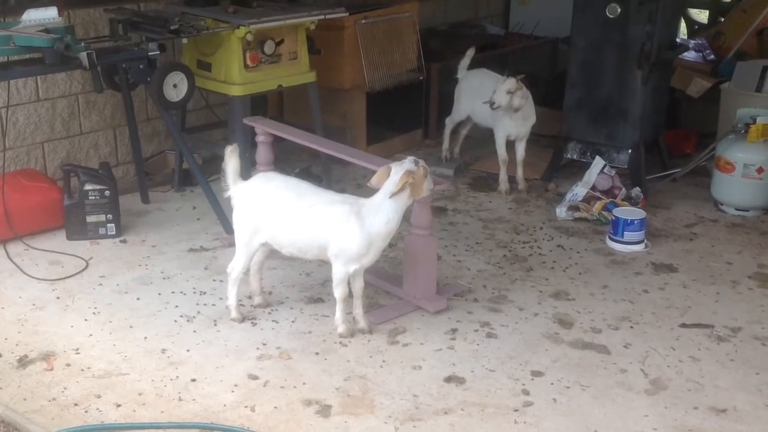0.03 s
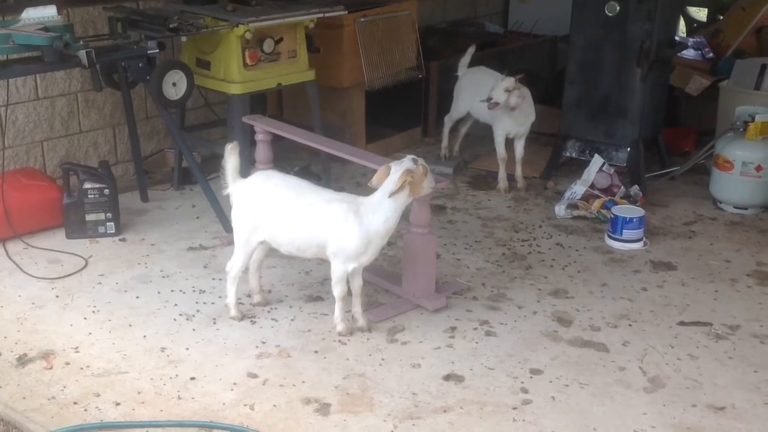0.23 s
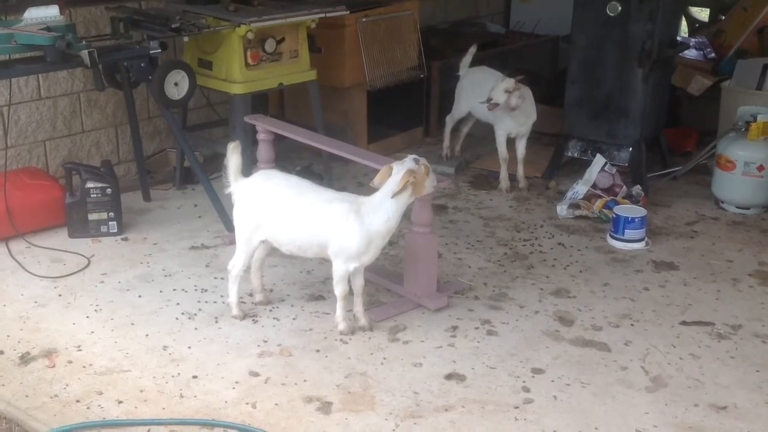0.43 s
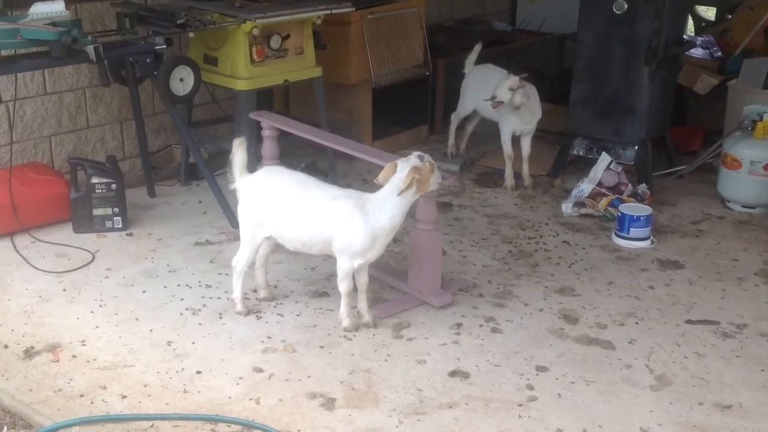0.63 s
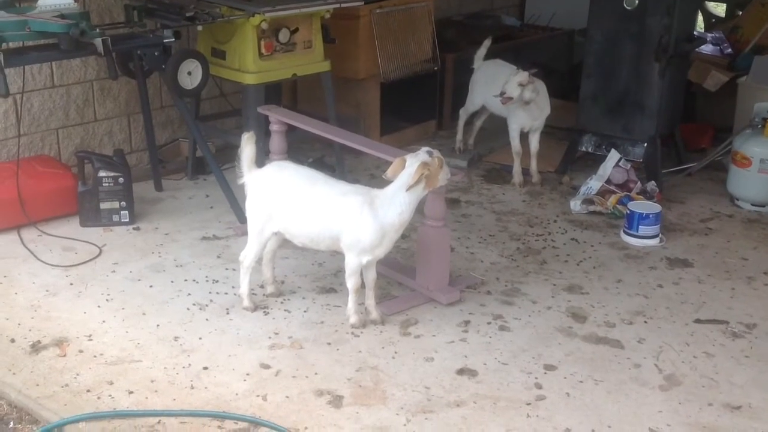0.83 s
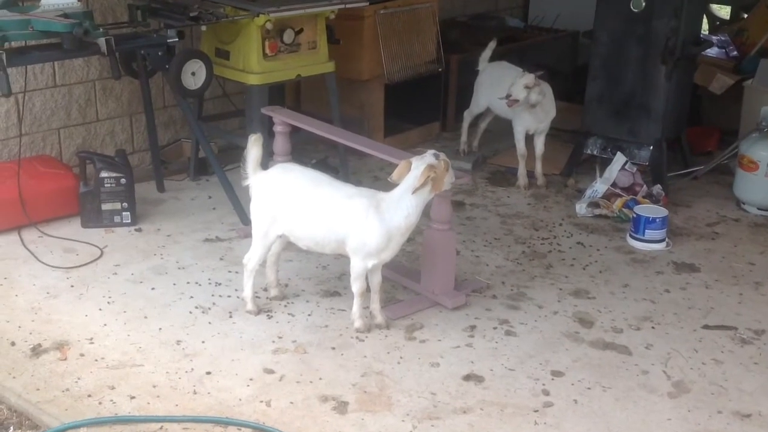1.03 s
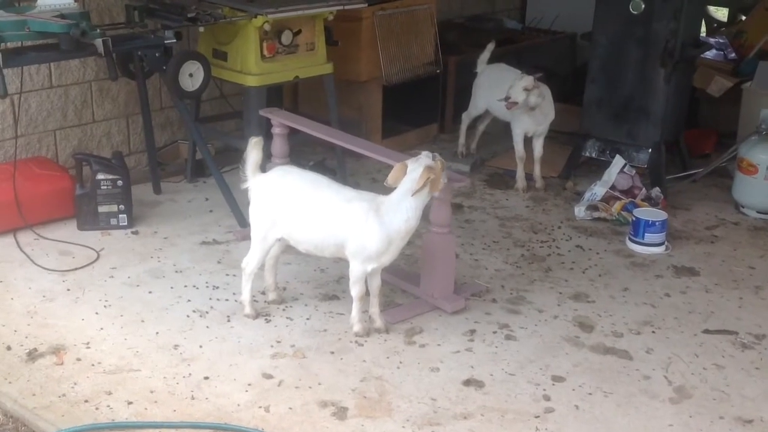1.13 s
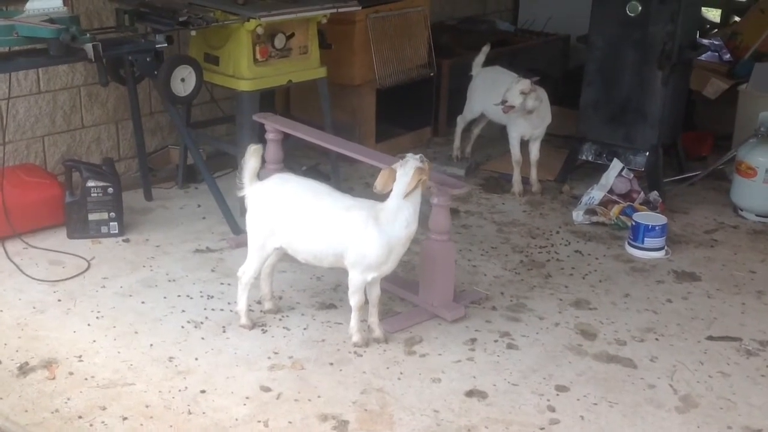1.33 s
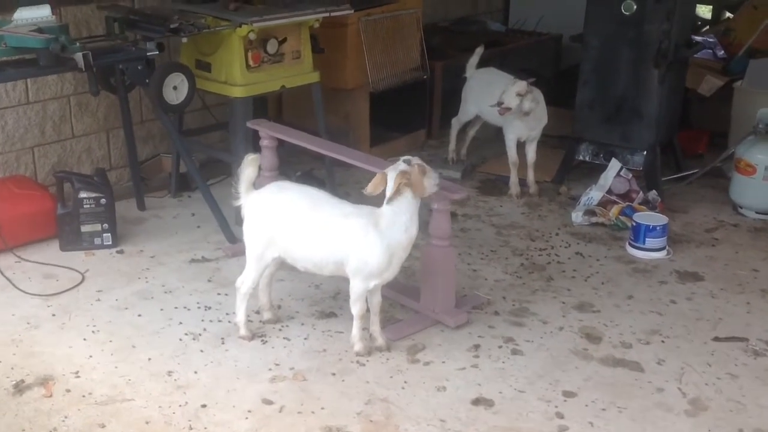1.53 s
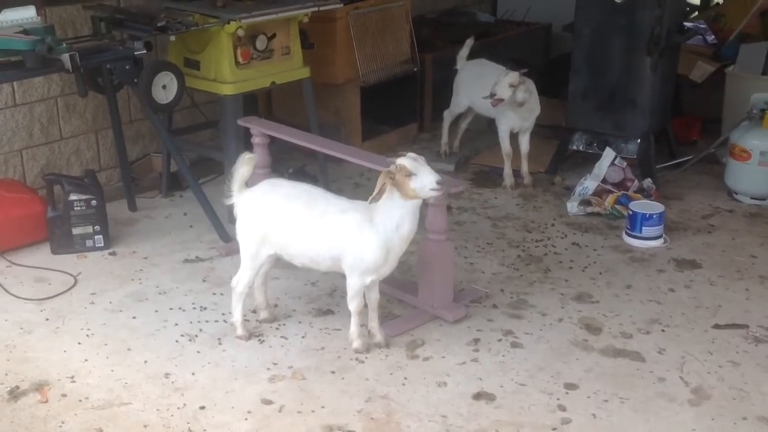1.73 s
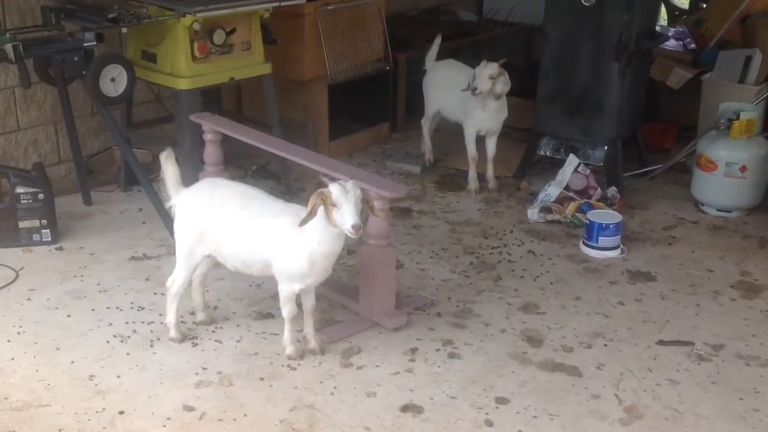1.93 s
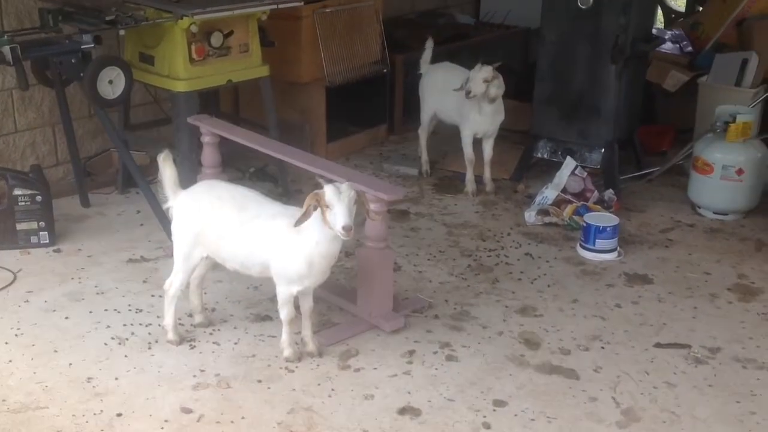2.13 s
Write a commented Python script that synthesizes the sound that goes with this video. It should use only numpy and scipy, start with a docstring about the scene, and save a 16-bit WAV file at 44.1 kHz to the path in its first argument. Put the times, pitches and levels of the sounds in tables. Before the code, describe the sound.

One long goat bleat like a human scream: raspy two-toned first half, a rough break, then a louder, brighter wail, cut short. Small diffuse garage tail, quiet background, handheld microphone with peaks squashed.

```python
"""A goat screams in an open garage, over a hum and distant hiss, with rustling at the start and end.
Shaped noise rasps throughout the call; a ringing throat tone with a low voice makes the hoarse start. Two
independent pitches with their sum and difference tones follow, break, and lock onto one loud harmonic stack
led by its second harmonic. An edit cuts the call short and the background drops out for a moment. A short
diffuse tail gives the room; the recorder cuts the lows and limits the peaks."""
import sys
import numpy as np
from scipy import signal
from scipy.fft import rfft, irfft, next_fast_len
from scipy.io import wavfile
from scipy.ndimage import uniform_filter1d, minimum_filter1d, map_coordinates

SR = 44100
rng = np.random.default_rng(int(sys.argv[2]) if len(sys.argv) > 2 else 0)


def decibels_to_gain(level_db):
    """Convert a level in decibels to a linear amplitude gain (20 dB per decade)."""
    exponent = np.asarray(level_db, float) / 20
    return 10 ** exponent


def store_pcm(level_fs):
    """Save levels as 16-bit WAV."""
    pcm = np.round(np.clip(level_fs, -1, 1) * 32767).astype(np.int16)
    wavfile.write(sys.argv[1], SR, np.atleast_2d(pcm).T)


N = 97020  # 2.2 s


def unit(x):
    """Scales to rms 1."""
    return x / np.sqrt(np.mean(x ** 2) + 1e-20)


def along(points, hz):
    """Reads (f/Hz, value) points on a log frequency axis."""
    f, v = np.transpose(points)
    return np.interp(np.log(hz + 1), np.log(f + 1), v)


def curves(rows):
    """One value per sample for each column after the time."""
    s, *cols = np.transpose(rows)
    return [np.interp(np.arange(N) / SR, s, c) for c in cols]


def within(rows):
    """1 inside the table's time span, with 12 ms ramps outside it."""
    t = np.arange(N) / SR
    return np.clip(np.minimum(t - rows[0][0], rows[-1][0] - t) / .012 + 1, 0, 1)


def wobble(rate):
    """A smooth random curve, rate knots a second."""
    knots = rng.standard_normal(int(N * rate / SR) + 4)
    return map_coordinates(knots, [np.arange(N) * rate / SR], order=2)


def phase(hz, wide_hz):
    """Running phase of an oscillator whose pitch scatters quickly."""
    return 2 * np.pi * np.cumsum(hz + wide_hz * wobble(150)) / SR


def noise(spectrum):
    """Coloured noise of rms 1, shaped in the spectrum."""
    m = next_fast_len(N + 8192)
    white = rfft(rng.standard_normal(m))
    colour = decibels_to_gain(along(spectrum, np.fft.rfftfreq(m, 1 / SR)))
    return unit(irfft(white * colour, m)[:N])


def background():
    """Distant hiss and rustling are coloured noise; the hum is one slightly unsteady sine."""
    # colour of the distant hiss: (f/Hz, relative level/dB)
    yard_colour = [(70, -69), (100, -12.5), (235, -3.5), (560, -19.5), (1310, -13.5), (3210, -23.5),
                   (15400, -36)]
    # level of hiss and hum, dropping out briefly at the edit: (t/s, level/dB)
    yard_level = [(0, -42), (.8, -46), (1.95, -48), (1.965, -80), (1.995, -49.5), (2.2, -47)]
    # level of the rustling: (t/s, level/dB)
    stir_level = [(0, -41.5), (.2, -53.5), (2.14, -60), (2.2, -39.5)]
    # colour of the rustling: (f/Hz, relative level/dB)
    stir_colour = [(300, -21), (700, 7), (3500, -9.5), (9000, -34)]
    hum_hz, hum_db = 115.6, -8  # sine amplitude against the hiss rms
    hum = decibels_to_gain(hum_db + 1.4 * wobble(8)) * np.sin(phase(hum_hz, 1.5))
    hiss = noise(yard_colour) * decibels_to_gain(1.2 * wobble(7.6))
    yard = decibels_to_gain(curves(yard_level)[0]) * (hiss + hum)
    rustling = decibels_to_gain(curves(stir_level)[0] + 2.8 * wobble(90)) * noise(stir_colour)
    return yard + rustling


def rasp():
    """Rough coloured noise with the call, its level fluttering fast, and a treble hiss made alike."""
    # level of the rough noise: (t/s, level/dB)
    body_level = [(.1, -80), (.13, -39), (.21, -17.5), (.35, -17.5), (.55, -24.5), (.8, -28.5),
                  (.94, -21.5), (.99, -17.5), (1.14, -21), (1.17, -34.5), (1.28, -24), (1.39, -29.5),
                  (1.42, -34.5), (1.97, -32)]
    # colour of the rough noise: (f/Hz, relative level/dB)
    body_colour = [(350, -38.5), (750, -23), (1050, -8), (1650, -25.5), (2200, -13), (2380, -2),
                   (2560, -12), (4100, -15.5), (4630, -33), (15400, -60)]
    # level of the treble hiss: (t/s, level/dB)
    hiss_level = [(.11, -63), (.2, -38), (.55, -33), (.76, -40.5), (1.03, -37), (1.42, -45), (1.96, -42)]
    # colour of the treble hiss: (f/Hz, relative level/dB)
    hiss_colour = [(3500, -35), (4700, -17.5), (5600, -12.5), (7000, -16.5), (8200, -18), (11500, -27),
                   (15400, -49.5)]
    body = decibels_to_gain(curves(body_level)[0] + 1.2 * wobble(320)) * noise(body_colour)
    hiss = decibels_to_gain(curves(hiss_level)[0] + 0.9 * wobble(200)) * noise(hiss_colour)
    return body + hiss


def garage(x):
    """A short diffuse tail: decaying noise of unit energy, convolved with the sound."""
    t60_s, delay_s = .28, .006
    t = np.arange(SR // 2) / SR
    tail = rng.standard_normal(len(t)) * decibels_to_gain(-60 * t / t60_s) * (t > delay_s)
    return signal.fftconvolve(x, tail / np.linalg.norm(tail))[:N]


def hoarse_start():
    """The throat rings as a rough, scattered sine while a low voice of three harmonics starts."""
    # ringing throat tone: (t/s, f/Hz, level/dB)
    ring_track = [(.12, 860, -28.5), (.16, 985, -18.5), (.25, 1080, -11.5), (.31, 1112, -17.5),
                  (.35, 1090, -21.5), (.42, 1105, -23.5)]
    # low voice: (t/s, pitch/Hz, level/dB)
    low_track = [(.125, 578, -29), (.16, 596, -34), (.18, 635, -27.5), (.21, 625.6, -27), (.32, 638, -22),
                 (.34, 660, -41)]
    ring_wide_hz, low_wide_hz = 32, 14  # pitch scatter
    rough_db = 4
    octave_db, fourth_db = -9, -4  # second and fourth harmonic against the first
    hz, db = curves(ring_track)
    low_hz, low_db = curves(low_track)
    ring = decibels_to_gain(db + rough_db * wobble(71)) * np.sin(phase(hz, ring_wide_hz)) * within(ring_track)
    p = phase(low_hz, low_wide_hz)
    low_level = decibels_to_gain(low_db + 6.2 * wobble(39.8))
    octave = decibels_to_gain(octave_db) * np.sin(2 * p)
    fourth = decibels_to_gain(fourth_db + rough_db * wobble(72)) * np.sin(4 * p)
    low = low_level * (np.sin(p) + octave + fourth) * within(low_track)
    return ring + low


def double_voice():
    """Two pitches at once: harmonics of the upper one with side tones spaced by the lower one."""
    # both voices: (t/s, upper pitch/Hz, lower pitch/Hz, level/dB, side tones per step/dB,
    # added lead of first upper harmonic over second/dB)
    voices = [(.33, 848, 508, -33.5, 5, 11), (.37, 847, 502.6, -24.5, -4, 9),
              (.54, 857, 508, -20.5, -4.5, 0), (.61, 868, 502, -20.5, -9, -0.5),
              (.73, 872, 501.7, -23, -7.5, 8), (.78, 882, 496, -25, -18, -14.5),
              (.84, 879.6, 496.7, -21.5, -14, -6), (.95, 890.5, 485, -21.5, -13, -7.5),
              (1.01, 869, 495, -24, -19, -10)]
    # throat colour: (f/Hz, relative level/dB)
    throat = [(500, -15), (870, -1.5), (1300, -3), (1750, -7), (2250, -3), (3050, -3), (3950, -0.5),
              (4300, -17.5), (6000, -22), (12500, -45)]
    wide_hz, flicker_db = 1.5, 4.5  # pitch scatter; level flicker, in full from 2 kHz up
    hi, lo, db, side_db, lead_db = curves(voices)
    p, q = phase(hi, wide_hz), phase(lo, wide_hz)
    # m upper pitches plus n lower pitches
    tones = [(0, 1), (0, 2)]
    tones += [(m, n) for m in range(1, 14) for n in (-1, 0, 1, 2, 3) if m + n > 0]
    out = np.zeros(N)
    for m, n in tones:
        hz = m * hi + n * lo
        level = along(throat, hz) + abs(n) * side_db
        level += flicker_db * np.minimum(hz / 2000, 1) * wobble(25)
        if n == 0 and m < 3:
            level -= lead_db / 2 * (-1) ** m
        out += decibels_to_gain(level) * np.sin(m * p + n * q + rng.uniform(0, 2 * np.pi))
    return decibels_to_gain(db) * out * within(voices)


def scream():
    """One harmonic stack, unsteady through the break, then clearer; overtones flicker on their own."""
    # the one voice: (t/s, pitch/Hz, second harmonic/dB, gain of third harmonic and up/dB)
    voice = [(.98, 534.7, -16.5, -34), (1.008, 512.4, -7.5, -21.5), (1.035, 504.3, -0.5, -20.5),
             (1.09, 492.3, -14, -19.5), (1.19, 505.7, -3, -12.5), (1.265, 511, -6, -15.5),
             (1.3, 533, -1.5, -22.5), (1.345, 538.6, -2, -25.5), (1.445, 523, -0.5, -16),
             (1.49, 512.2, -6, -18), (1.545, 507.5, -7.5, -21), (1.59, 515, 2, -9), (1.7, 528.2, -1, -16),
             (1.84, 521.8, -3, -15.5), (1.9, 509.7, -5, -20), (1.92, 508.7, -14.5, -17),
             (1.965, 497.5, -4, -19)]
    # throat colour of the third harmonic and up: (f/Hz, relative level/dB)
    throat = [(1550, -12.5), (2050, -4.5), (2550, -4.5), (3100, -8.5), (3600, -10.5), (4100, -15.5),
              (4600, -28), (5300, -26.5), (12500, -44)]
    # moving upper resonance: (t/s, f/Hz)
    mouth_track = [(1.25, 2590), (1.33, 3370), (1.47, 2750), (1.65, 3130)]
    # brief dips of the second harmonic: (t/s, level change/dB)
    dips = [(1.047, -8), (1.077, -12), (1.136, -8), (1.47, -17)]
    # roughness of the overtones, a shared fast random level wobble: (t/s, share 0-1)
    roughness = [(1.25, .25), (1.64, .1), (1.71, .35)]
    mouth_db, mouth_wide_hz = 7.5, 353
    wide_hz, break_wide_hz = 1.26, 5  # pitch scatter, and its addition in the break
    flicker_db, break_rough_db = 2.2, 4
    break_end_s, dip_s = 1.145, .006  # dip_s: half-width of a dip
    first_db = -33
    t = np.arange(N) / SR
    hz, second_db, rest_db = curves(voice)
    mouth_hz = curves(mouth_track)[0]
    breaking = np.clip((break_end_s - t) / 0.036, 0, 1)
    p = phase(uniform_filter1d(hz, size=800), wide_hz + break_wide_hz * breaking)

    rest = np.zeros(N)
    for k in range(3, 25):
        mouth = mouth_db * np.exp(-((k * hz - mouth_hz) / mouth_wide_hz) ** 2)
        flicker = flicker_db * (wobble(20) + (1.38 + breaking / 2) * wobble(55.01))
        level = along(throat, k * hz) + mouth + flicker
        rest += decibels_to_gain(level) * np.sin(k * p + rng.uniform(0, 2 * np.pi))
    rest *= decibels_to_gain(rest_db) * (1 + curves(roughness)[0] * wobble(140))

    dip_db = sum(db * np.exp(-((t - s) / dip_s) ** 2) for s, db in dips)
    second = decibels_to_gain(second_db + dip_db + break_rough_db * breaking * wobble(170)) * np.sin(2 * p)
    # the first harmonic sinks with a weak second and rises roughly in the break
    first_level = first_db + np.minimum(second_db + 10, 0)
    first_level += breaking * (6 + 4 * wobble(150)) + 3.2 * wobble(22)
    first = decibels_to_gain(first_level) * np.sin(p)
    return (first + second + rest) * within(voice)


def scene():
    """The call and its room fade at the edit; the background lies under them."""
    cut_s, fade_s = 1.965, 0.027  # end and length of the fade
    room_db = -19
    goat = rasp() + hoarse_start() + double_voice() + scream()
    fade = np.clip((cut_s - np.arange(N) / SR) / fade_s, 0, 1)
    call = (goat + decibels_to_gain(room_db) * garage(goat)) * fade
    return (call + background())[None]


def band_limit(x):
    """A steep low-pass at the top of the band."""
    return signal.sosfilt(signal.butter(12, 15600, fs=SR, output="sos"), x)


def record(dry):
    """A low cut, then a fast peak limiter whose gain ducks ahead of each peak."""
    low_cut_hz, top, limit_samples = 90, .98, 130
    low_cut = signal.butter(3, low_cut_hz, "high", fs=SR, output="sos")
    x = signal.sosfilt(low_cut, dry)
    need = np.minimum(1, top / (np.abs(x) + 1e-9))
    gain = uniform_filter1d(minimum_filter1d(need, 2 * limit_samples), limit_samples)
    return band_limit(x * gain)


dry = scene()
out = record(dry)
store_pcm(out)
```